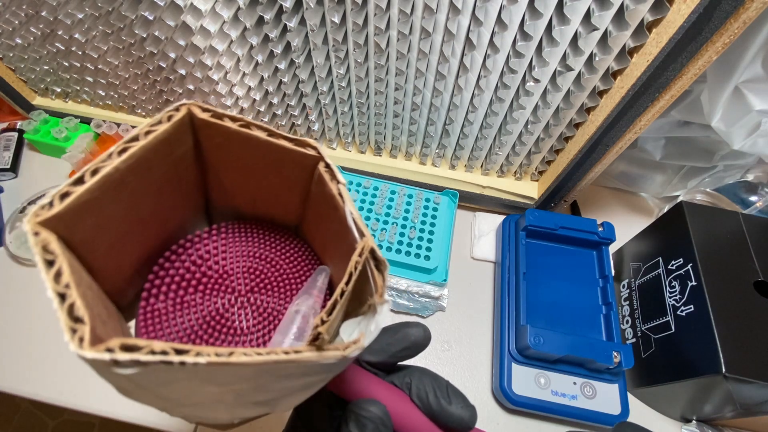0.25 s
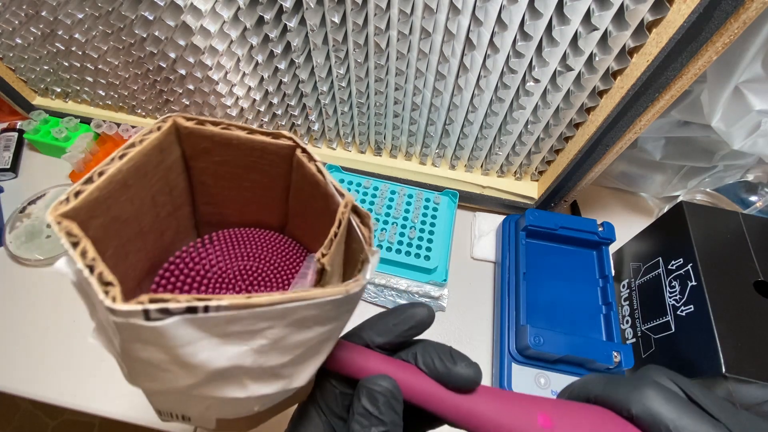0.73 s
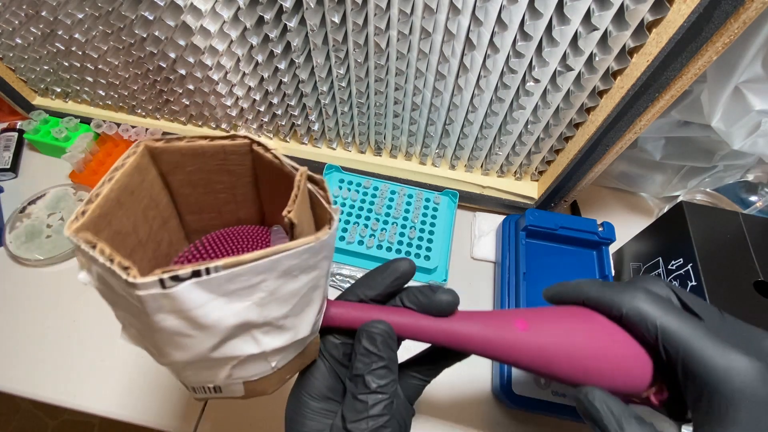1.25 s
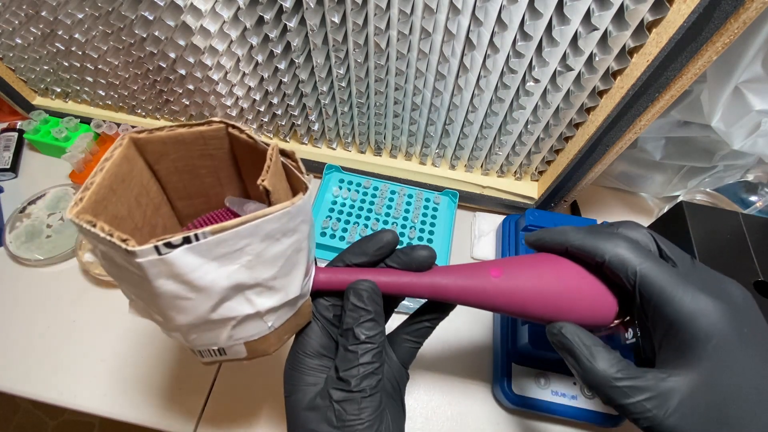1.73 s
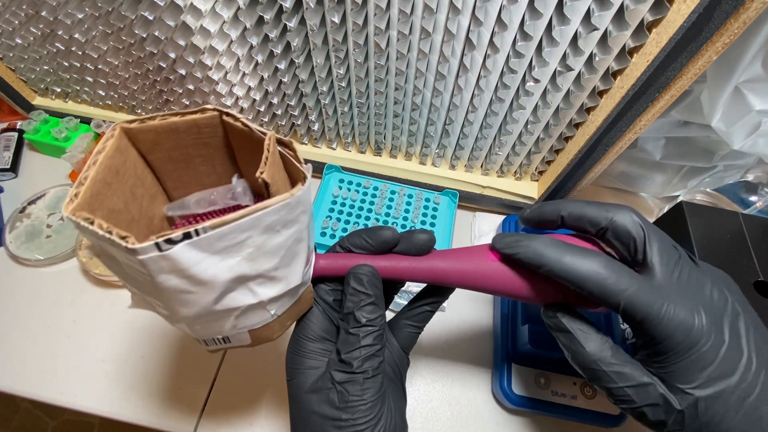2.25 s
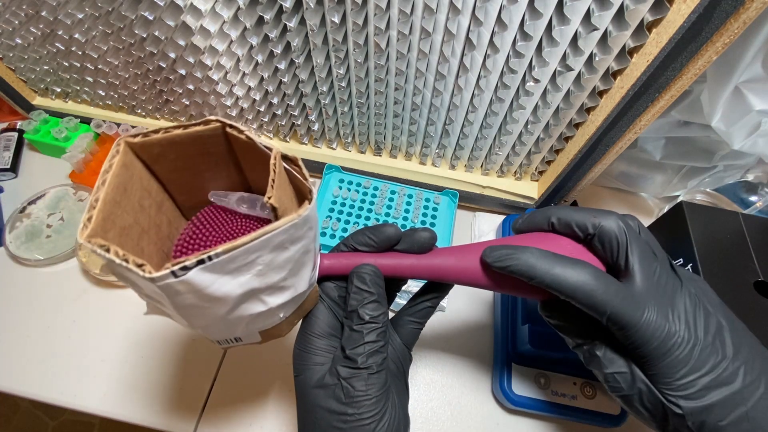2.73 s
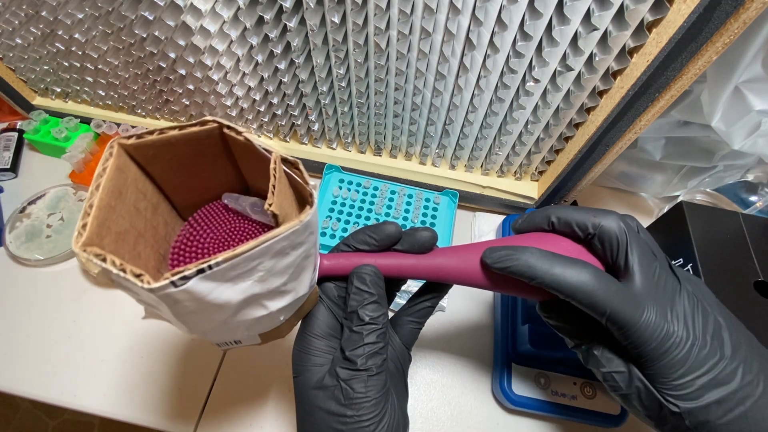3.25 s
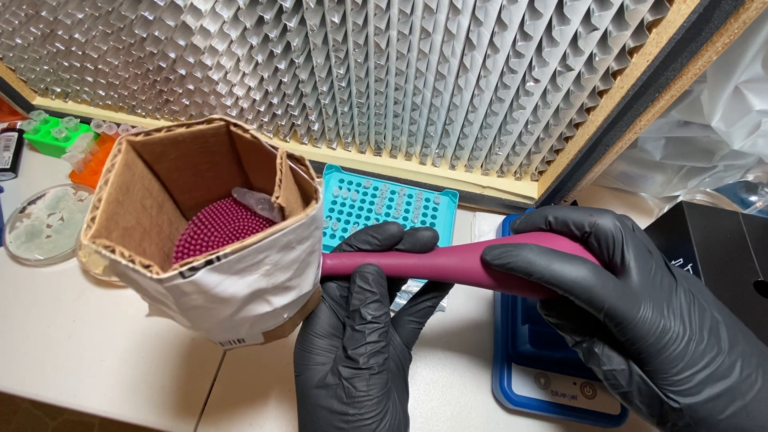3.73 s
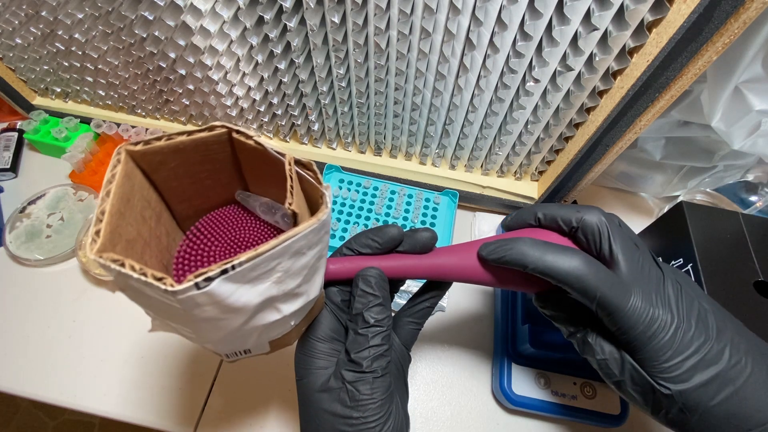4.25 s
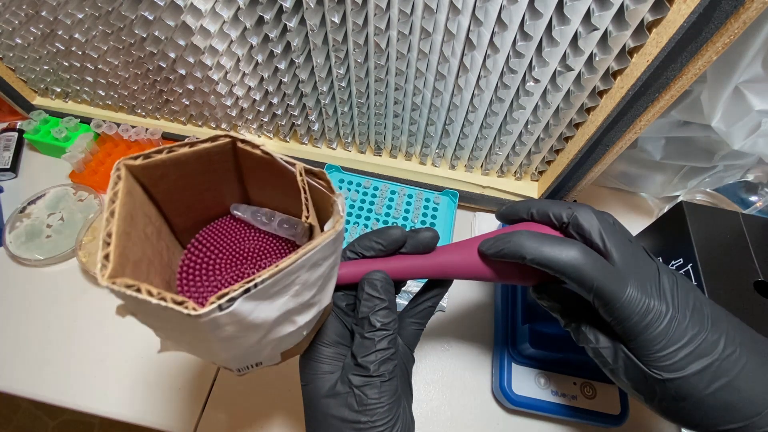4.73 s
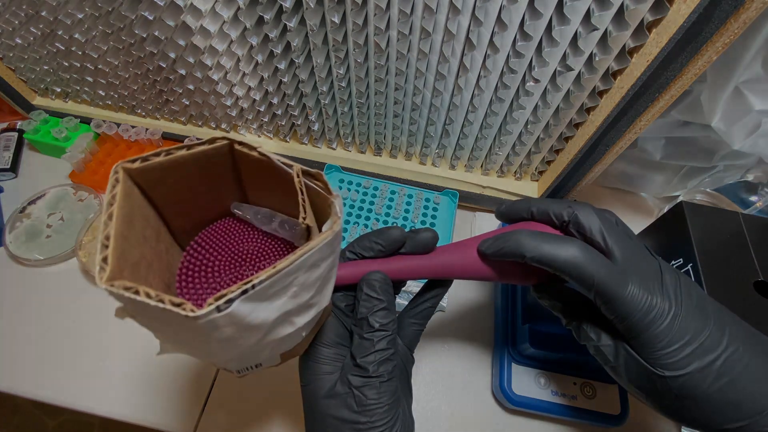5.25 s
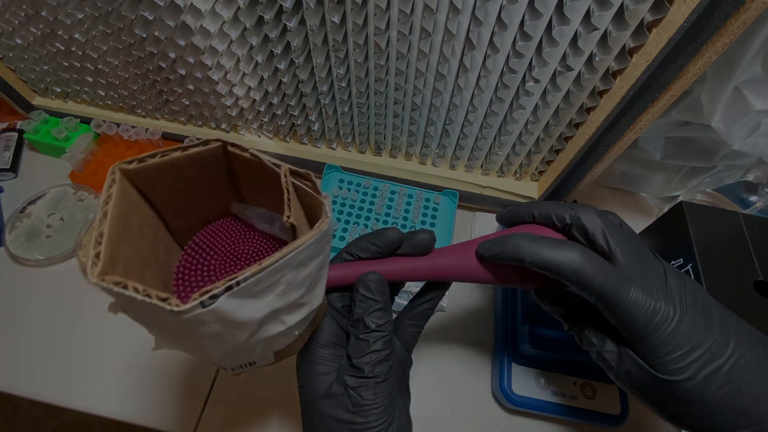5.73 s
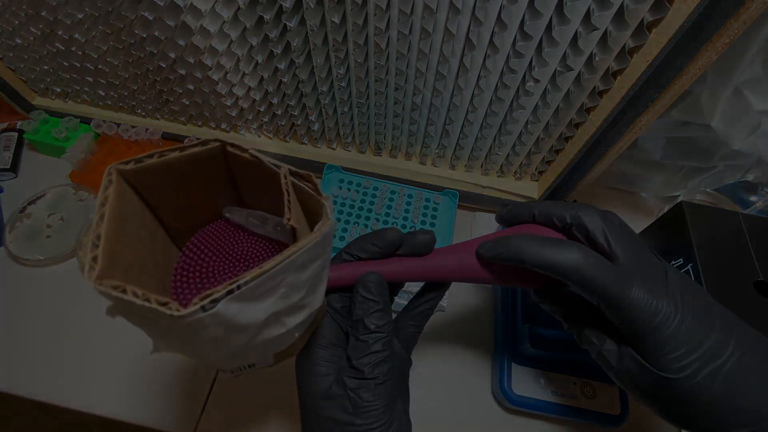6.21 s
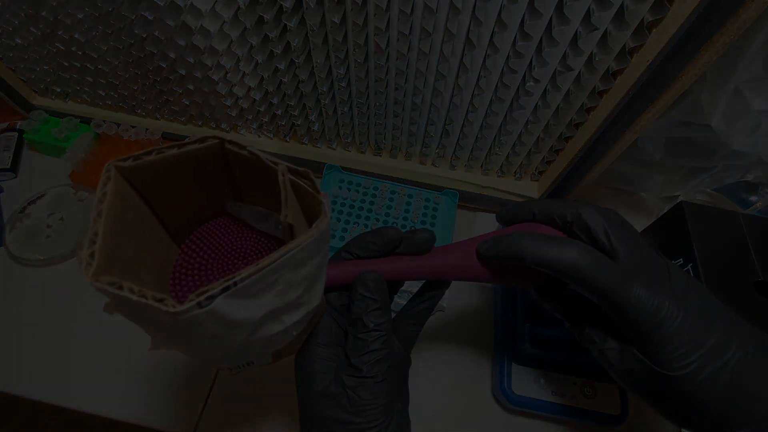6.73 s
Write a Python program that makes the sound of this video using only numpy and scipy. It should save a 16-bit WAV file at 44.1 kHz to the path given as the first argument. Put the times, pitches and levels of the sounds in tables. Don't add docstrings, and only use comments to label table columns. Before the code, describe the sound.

Low vibrating buzz with irregular hollow cardboard knocks and plastic ticks close by, slowly fading; a button click raises the hum before it dies.

```python
import sys
import numpy as np
from scipy import signal
from scipy.fft import rfft, irfft, next_fast_len
from scipy.io import wavfile
from scipy.ndimage import uniform_filter1d

SR = 44100
rng = np.random.default_rng(int(sys.argv[2]) if len(sys.argv) > 2 else 0)


def inscribe(sig):
    pcm = np.round(np.clip(np.atleast_2d(sig).T, -1, 1) * 32767)
    wavfile.write(sys.argv[1], SR, pcm.astype(np.int16))


def level_to_linear(level):
    exponent = np.asarray(level, float) / 20
    return 10 ** exponent


N = 307818


def unit(x):
    return x / np.sqrt(np.mean(x ** 2) + 1e-20)


def in_time(rows):
    t, *columns = np.transpose(rows)
    return [np.interp(np.arange(N) / SR, t, column) for column in columns]


def drift(rate):
    r = np.exp(-80 * np.pi * rate / SR)
    slow = signal.lfilter([1], [1, -2 * r, r * r], rng.standard_normal(N // 40 + 2002))
    slow = unit(slow[2000:])
    return np.interp(np.arange(N) / 40, np.arange(len(slow)), slow)


def train(at, sizes):
    clicks = np.full(N, 1e-18)
    np.add.at(clicks, at, sizes)
    return clicks


def resonate(x, peaks):
    out = 0
    for k, (hz, width_hz, db) in enumerate(peaks):
        r = np.exp(-np.pi * width_hz / SR)
        poles = [1, -2 * r * np.cos(2 * np.pi * hz / SR), r * r]
        zeros = np.array([1, 0, -1]) * (1 - r * r) / 2
        out = out + (-1) ** k * level_to_linear(db) * signal.lfilter(zeros, poles, x)
    return out


def strike(at, levels_db, modes, spread_db, sign=1):
    out = np.zeros((2, N))
    chance = rng.standard_normal((len(at), len(modes)))
    spot = np.arange(len(at)) % 3
    for k, (hz, db, t60, right_db, turn) in enumerate(modes):
        sizes = sign ** k * level_to_linear(levels_db + db + spread_db * chance[:, k])
        r = level_to_linear(-60 / (t60 * SR))
        for place in range(3):
            clicks = train(at[spot == place], sizes[spot == place])
            detune = 1 + .012 * (place - 1) * (-1) ** k
            w = 2 * np.pi * hz * detune / SR
            ring = signal.lfilter([1], [1, -2 * r * np.cos(w), r * r], clicks)
            out[0, 1:] += r * np.sin(w) * ring[:-1]
            turned = np.sin(turn) * ring[1:] + r * np.sin(w - turn) * ring[:-1]
            out[1, 1:] += level_to_linear(right_db) * turned
    return out


def crack(at, levels_db, peaks, dies_s, noise, click=0.19):
    clicks = train(at, level_to_linear(levels_db))
    dying = signal.lfilter([1], [1, -np.exp(-1 / (dies_s * SR))], clicks)
    return resonate(click * clicks + noise * dying, peaks)


def coloured(spectrum, alike):
    hz, db = np.transpose(spectrum)
    size = next_fast_len(N)
    bins_hz = np.arange(size // 2 + 1) * SR / size
    shape = level_to_linear(np.interp(np.log(bins_hz + 1), np.log(hz), db, right=-200))
    mid, side = irfft(rfft(rng.standard_normal((2, size))) * shape, size)[:, :N]
    alike = np.clip(alike, -1, 1)
    opposite = np.array([[1], [-1]])
    return unit(np.sqrt(1 + alike) * mid + np.sqrt(1 - alike) * side * opposite)


LOW_SPEED_HZ, HIGH_SPEED_HZ = 69.3, 84.2
# multiple of the low turn rate (those below 5 follow the motor, the others hold their pitch), #
# level/dB, phase between ports/rad
WHINE = [(2.047, -61, 0.18), (4.047, -66, 1.2), (7.31, -58, 2.9), (11.25, -63, 1.28), (12.9, -60.5, 1.9),
         (17.44, -83, 4.2), (30.64, -66, 4.9), (42.8, -74, 0.19)]


def motor(phase, hum_db, pan_db, lead):
    side = np.array([[.5], [-.5]])
    out = level_to_linear(hum_db + 5.5 + side * pan_db + 0.73 * drift(19.0)) * np.sin(phase + side * lead)
    smooth_db = uniform_filter1d(hum_db, size=SR // 3) + 35.0
    steady = 2 * np.pi * LOW_SPEED_HZ * np.arange(N) / SR
    for order, db, turn in WHINE:
        turning = phase if order < 5 else steady
        level = level_to_linear(db + smooth_db + 3.2 * drift(5.6) + side * 2.0)
        out += level * np.sin(order * turning + 1.02 * drift(3.0) + side * turn)
    return out


# t/s, hum level/dB
NEARNESS = [
    (0, -30.5),
    (.9, -32.5),
    (1.2, -34.5),
    (1.7, -36),
    (4.8, -36.5),
]
STEP_UP_S, SPIN_UP_S, STEP_UP_DB, OVERSHOOT_DB, SETTLE_S = 5.57, 0.162, -1.5, 4, 0.67
SWITCH_OFF_S, RUN_DOWN_HZ_PER_S2 = 6.55, 190
STALL_S, STALL_DB_PER_S = 6.79, 135
DIP_S, DIP_DB_PER_S, KICK_S, KICK_DB_PER_S = 6.91, 302, 6.94, 750
FADE_S, FADE_DB_PER_S = 4.27, 1.5


def controls():
    t = np.arange(N) / SR

    def since(start_s):
        return np.maximum(t - start_s, 0)

    spun = np.clip((t - STEP_UP_S) / SPIN_UP_S, 0, 1)
    speed_hz = LOW_SPEED_HZ + (HIGH_SPEED_HZ - LOW_SPEED_HZ) * spun
    speed_hz -= RUN_DOWN_HZ_PER_S2 * since(SWITCH_OFF_S) ** 2
    fade_db = -FADE_DB_PER_S * since(FADE_S)
    overshoot_db = OVERSHOOT_DB * np.exp(-since(STEP_UP_S + SPIN_UP_S) / SETTLE_S)
    hum_db = in_time(NEARNESS)[0] + fade_db + spun * (STEP_UP_DB + overshoot_db)
    hum_db -= STALL_DB_PER_S * since(STALL_S) + DIP_DB_PER_S * since(DIP_S)
    hum_db += KICK_DB_PER_S * since(KICK_S)
    return 2 * np.pi * np.cumsum(speed_hz) / SR, hum_db, fade_db


# f/Hz, level/dB, t60/s, right port level/dB, right port phase/rad
CUP_WALL = [(933, -9.5, 0.062, -9, 4.35), (1103.5, -5, 0.077, -8.5, 3.45), (1132.4, -17, 0.18, -8.5, 2.36),
            (1221.6, -16, 0.17, -5.5, 2.03), (1163, -1.5, 0.039, -6.5, 3.43), (734, -19.5, 0.031, 7, 3.62),
            (3030, -13.5, 0.0051, -3, 1.5)]
CUP_AIR = [(1234, -2.5, 0.025, -6, 2.1), (1320, -10.5, 0.0077, -2.5, 2.88), (2113, -18, 0.013, -1, 0.74)]
CUP_RIM = [(1509, -10.5, 0.034, -4.5, 2.6), (1644, -12, 0.032, -4.5, 2.4),
           (1810, -10.5, 0.031, -11.5, 3.73), (1945, -25, 0.15, 1.5, 2.27)]
THUMP = [(373.3, -4.5, 0.072, -3.5, -1.3), (541, 2.5, 0.024, -14.5, -3.5), (693, -3, 0.025, -6.5, -5)]
# f/Hz, width/Hz, level/dB
SLAP = [(1110, 300, -3.5), (1450, 500, -20), (2240, 600, 20.5), (3200, 3200, -11.5)]
EDGE = [(2070, 390, -4.5), (2820, 740, 4), (4490, 1920, 3), (5230, 1350, 4.5), (6960, 10300, -13)]
TICK = [(8360, 330, 5), (10280, 1300, 3), (12440, 2130, 4.5), (15900, 2000, -3)]
# t/s, wall level/dB, dull thump level/dB, cup air level/dB, rim level/dB
POSE = [(0, -14.5, -9, 5.5, -9), (1.2, -4.5, -3, 7, -2.5), (1.5, -5.5, -9, -2, -2),
        (1.7, -2.5, -4.5, -1, 1.5), (2.0, -1, -6.5, 1.5, -2), (2.35, 1, -2, -2, -5.5),
        (2.48, -4.5, -23, 2.5, 1.5), (3.0, -2.5, -12, 1.5, 0.5), (3.3, -0.5, -5, -7.5, -2.5),
        (5.0, 0.5, -6, -8.5, -3), (6.98, -5.5, -9.5, -9.5, -8)]


def tube(at, db, edge_db, tick_db):
    wall_db, thump_db, air_db, rim_db = (db + column[at] for column in in_time(POSE))
    body = strike(at, wall_db + 2.5, CUP_WALL, spread_db=3.5)
    body += strike(at, air_db + 0.5, CUP_AIR, spread_db=2.5)
    body += strike(at, rim_db + 2.0, CUP_RIM, spread_db=4.5)
    little_bass = signal.butter(3, 840, "high", fs=SR, output="sos")
    body = signal.sosfilt(little_bass, body)
    body += strike(at, thump_db - 7.0, THUMP, spread_db=4.5, sign=-1.16)
    out = signal.sosfilt(signal.butter(1, 3000, fs=SR, output="sos"), body)
    out += crack(at, db + 2.5, SLAP, .001, 0, click=0.63) * np.array([[1], [-.3]])
    shared, left, right = rng.standard_normal((3, N))
    out[0] += crack(at, edge_db + 10.0, EDGE, 0.0024, 0.34 * shared + 1.1 * left, click=1.33)
    out[1] += crack(at, edge_db + 8.5, EDGE, 0.0023, 1.02 * right - 0.14 * shared, click=0.19)
    tick = crack(at, tick_db + 10.0, TICK, 0.00086, shared)
    out[0] += tick
    out[1] -= np.roll(tick, -10)
    return out


# t/s, peak level/dB, brightness
# level/dB
TOUCHES = [(0.006, -17, -11.5), (0.015, -22, -21.5), (0.037, -24, -14), (0.0458, -34, -16),
           (0.0634, -16, -15), (0.074, -33, -18), (0.1047, -16, -19), (0.133, -50, -25), (0.146, -38, -30),
           (0.1653, -20, -22), (0.174, -25, -28), (0.1969, -27, -19), (0.2051, -19.5, -18),
           (0.2364, -29, -20), (0.249, -45, -15), (0.2613, -17, -16), (0.2928, -54, -17),
           (0.3062, -14.5, -20), (0.315, -36, -25), (0.323, -42, -24), (0.3508, -15.5, -12),
           (0.3788, -27, -34), (0.392, -23, -7), (0.4196, -26.5, -20), (0.4342, -24, -15), (0.449, -36, -9),
           (0.471, -33, -14), (0.4777, -18.5, -18), (0.512, -19.5, -17), (0.5193, -40, -20),
           (0.5552, -21, -13), (0.5693, -20, -13), (0.5934, -32, -11), (0.612, -18.5, -13.5),
           (0.665, -24.5, -14.5), (0.6844, -38, -21), (0.6944, -49, -22), (0.7248, -19, -12.5),
           (0.7422, -38, -21), (0.7711, -20, -12.5), (0.7862, -33, -22), (0.813, -20.5, -18.5),
           (0.8581, -19.5, -13), (0.9047, -25, -19), (0.915, -19, -10), (0.9713, -46, -18),
           (0.9884, -19, -11), (0.996, -32, -23), (1.0305, -23, -10), (1.0874, -22, -10),
           (1.156, -27.5, -7.5), (1.1929, -52, -15), (1.2048, -27, -11.5), (1.2467, -22, -21),
           (1.3003, -35, -11), (1.317, -26.5, -9), (1.3769, -22.5, -20), (1.417, -17, -12.5),
           (1.49, -39, -13), (1.506, -16.5, -27), (1.5204, -23, -20), (1.5459, -20.5, -11.5),
           (1.601, -35, -13), (1.6374, -22, -14.5), (1.6633, -21.5, -16), (1.6696, -21.5, -27),
           (1.6766, -23, -32), (1.6892, -29, -14), (1.703, -21, -40), (1.7315, -40, -35),
           (1.7509, -27, -37), (1.7617, -22, -39), (1.7779, -18.5, -23), (1.8031, -23.5, -34),
           (1.8181, -23, -15), (1.835, -25, -31), (1.8534, -27, -32), (1.862, -26.5, -40),
           (1.879, -27, -33), (1.892, -20, -18), (1.911, -33, -29), (1.9183, -29, -35), (1.9329, -23, -18),
           (1.9486, -24.5, -33), (1.991, -31, -18), (2.007, -29.5, -17), (2.034, -28, -18),
           (2.051, -25.5, -18), (2.0572, -18.5, -13), (2.064, -33, -23), (2.086, -40, -25),
           (2.0972, -14, -27), (2.1108, -29, -24), (2.1358, -24, -21), (2.165, -27, -14),
           (2.1966, -23, -22), (2.228, -14, -24.5), (2.2384, -18.5, -12), (2.302, -41, -14),
           (2.312, -20.5, -12), (2.3254, -17.5, -12), (2.344, -24.5, -12), (2.3863, -20, -18),
           (2.403, -37, -22), (2.4126, -26, -13), (2.4756, -17.5, -20), (2.492, -23.5, -11),
           (2.5171, -9.5, -29), (2.528, -24, -17), (2.599, -17.5, -38), (2.637, -36, -10),
           (2.6605, -11, -21), (2.673, -32, -6), (2.7116, -34, -28), (2.8234, -18.5, -27),
           (2.8347, -21.5, -15), (2.847, -24.5, -17), (2.8747, -12, -20),
           (3.056, -53, -24), (3.089, -51, -27), (3.132, -48, -25), (3.1465, -30.5, -20),
           (3.1624, -51, -27), (3.1728, -26, -17), (3.1787, -14.5, -19.5), (3.2359, -23.5, -16),
           (3.2755, -42, -22), (3.2892, -28.5, -23), (3.322, -28.5, -39), (3.353, -31, -32),
           (3.422, -25, -26), (3.4374, -19, -15), (3.4503, -23, -19), (3.4673, -26.5, -24),
           (3.506, -43, -13), (3.5218, -27, -26), (3.53, -30, -16), (3.5392, -22.5, -19),
           (3.5506, -22.5, -29), (3.5617, -38, -20), (3.5712, -32, -20), (3.5978, -33, -16),
           (3.626, -30, -37), (3.6526, -29, -34), (3.6688, -26.5, -28), (3.683, -19.5, -23.5),
           (3.71, -35, -22), (3.728, -26, -8.5), (3.7367, -20.5, -29), (3.7951, -23, -15),
           (3.8097, -23, -22), (3.8301, -26.5, -25), (3.843, -29, -29), (3.8604, -39, -29),
           (3.8717, -45, -18), (3.8842, -26, -23), (3.902, -25.5, -26), (3.9132, -20.5, -18),
           (3.9249, -26, -35), (3.9412, -21, -19), (3.993, -42, -29), (4.0129, -28, -37), (4.038, -31, -36),
           (4.055, -42, -30), (4.069, -23.5, -38), (4.0867, -20, -16), (4.1164, -31, -25),
           (4.136, -53, -17), (4.1436, -19, -17.5), (4.178, -45, -17), (4.1843, -31, -25),
           (4.2327, -24.5, -14), (4.2435, -36, -6), (4.2605, -28, -28), (4.274, -18.5, -13),
           (4.289, -32, -32),
           (4.301, -34, -11), (4.318, -26, -26), (4.3502, -28, -15), (4.362, -24.5, -16),
           (4.3713, -30, -25), (4.4, -30, -36), (4.417, -24, -28), (4.432, -21.5, -13), (4.4607, -31, -21),
           (4.4864, -30, -25), (4.505, -21, -22), (4.5435, -38, -25), (4.5592, -23.5, -30),
           (4.601, -44, -25), (4.6163, -28, -27), (4.6368, -23, -11), (4.6484, -18.5, -12),
           (4.66, -33, -17), (4.6753, -31, -24), (4.7038, -24.5, -24), (4.727, -43, -23),
           (4.7423, -44, -18), (4.757, -33, -20), (4.7786, -36, -19), (4.7921, -21, -10),
           (4.8187, -23.5, -30), (4.8766, -26, -19), (4.893, -29, -30), (4.9094, -26.5, -14),
           (4.922, -48, -24), (4.9351, -20, -11), (4.9803, -30, -36), (4.9931, -28.5, -42),
           (5.037, -29.5, -34), (5.0513, -36, -23), (5.0792, -15.5, -10), (5.121, -31, -26),
           (5.194, -28, -38), (5.205, -26.5, -20), (5.221, -27, -33), (5.2386, -33, -30),
           (5.2467, -36, -18), (5.256, -26, -13), (5.2837, -22.5, -29), (5.3092, -29, -36),
           (5.352, -31, -30), (5.3667, -21, -11), (5.379, -25, -29), (5.396, -37, -8), (5.421, -29, -25),
           (5.4405, -25, -19), (5.469, -26.5, -31), (5.4983, -22, -9.5), (5.5099, -24.5, -18),
           (5.5348, -31, -25), (5.5587, -29.5, -12), (5.574, -21, -16), (5.5975, -27.5, -26),
           (5.6475, -27.5, -19), (5.6697, -52, -18), (5.6814, -32, -33), (5.71, -21.5, -20),
          (5.72, -35, -32), (5.733, -38, -20), (5.7464, -27.5, -13), (5.763, -30, -27),
          (5.7871, -27.5, -25), (5.812, -24.5, -28), (5.829, -34, -18), (5.85, -17, -20),
          (5.8603, -38, -26), (5.885, -39, -20), (5.908, -33, -19), (5.9408, -23, -19), (5.9526, -21, -20),
          (5.991, -31, -21), (6.0015, -22, -17), (6.022, -30, -23), (6.0939, -24, -22), (6.1161, -19, -15),
          (6.153, -32, -27), (6.168, -34, -28), (6.2105, -29.5, -17), (6.2332, -27.5, -30),
          (6.259, -39, -26), (6.2732, -20, -11), (6.319, -27, -30), (6.3523, -31, -24), (6.392, -21.5, -14),
          (6.416, -29.5, -21), (6.4404, -38, -22), (6.4619, -24.5, -15), (6.4965, -25, -26),
          (6.5113, -23, -19), (6.543, -33, -25), (6.5682, -28.5, -33), (6.603, -41, -26),
          (6.6127, -53, -21), (6.6202, -25.5, -14.5), (6.659, -31, -22), (6.6689, -22, -17),
          (6.676, -33, -19), (6.702, -35, -34), (6.7185, -30, -19), (6.745, -36, -32), (6.7573, -31, -39),
          (6.7828, -29, -14), (6.815, -37, -25), (6.839, -36.5, -39), (6.8577, -23.5, -22),
          (6.8776, -31.5, -30), (6.9106, -25, -24), (6.934, -36, -36)]
# t/s, extra hard edge level/dB
SQUARE = [(0, -7), (1.2, -2.5), (1.6, 2.5), (1.75, 0), (2.03, -4.5), (2.35, -1), (2.52, 2), (2.9, -2),
          (3.2, 0), (4.9, 2.5), (5.5, 3), (6.98, -10)]
TICK_DULLS_DB_PER_S = 0.67


def landings():
    t, db, bright = np.transpose(np.array(TOUCHES))
    at = ((t + .0004) * SR).astype(int)
    db, bright = db - 6.0, bright - 5.5
    edge = -16 + in_time(SQUARE)[0][at] + 0.52 * (bright + 20) + 0.03 * (db + 30.0)
    edge += rng.standard_normal(len(at))
    return at, db, db + edge, db + bright + 3.0 - TICK_DULLS_DB_PER_S * t


# f/Hz, width/Hz, level/dB
SNAP = [(3700, 1240, 7.5), (4860, 1170, 10.5), (6550, 2200, 2.5), (10700, 3100, -6)]
# t/s, peak level/dB
BUTTON = [
    (5.4028, -23),
    (5.584, -39),
    (6.3382, -26),
    (6.487, -39),
    (6.9734, -29.5),
]


def button():
    t, db = np.transpose(BUTTON)
    at = (t * SR).astype(int)
    noise = rng.standard_normal((3, N))
    snap = crack(at + 36, db + 7.5, SNAP, 0.0013, 0.22 * noise[2] + 0.22 * noise[:2], click=1.14)
    first_tick = crack(at - 4, db - 6.5, TICK, 0.00028, noise[2])
    rebound = crack(np.minimum(at + 180, N - 1), db - 8.0, SNAP, 0.00067, 0.34 * noise[:2])
    echo = crack(at, db - 23.5, SNAP, 0.041, noise[:2], click=0)
    return (snap + first_tick + rebound + echo) * level_to_linear(np.array([[1.5], [-1.5]]))


def bench(x):
    dull = signal.sosfilt(signal.butter(1, 6000, fs=SR, output="sos"), x)
    out = np.zeros_like(x)
    for k, lag_s in enumerate(rng.uniform(0.005, .06, 24)):
        lag = int(lag_s * SR)
        out[k % 2, lag:] += (-1) ** (k // 2) * level_to_linear(-14.0 - 343 * lag_s) * dull[k % 2, :-lag]
    return out


# f/Hz, level/dB per Hz
WHIRR = [(300, -29), (450, -3.5), (650, -4), (900, -2), (1200, -2.5), (1500, -7.5), (2000, -11),
         (2500, -17.5), (3000, -15), (4000, -20), (4900, -16.5), (6000, -24.5), (7500, -24), (9000, -70)]
RUMBLE = [(15, -10), (30, -28), (60, 12.5), (120, -7.5), (200, -2.5), (300, -12.5), (450, -13.5),
          (800, -54)]
HISS = [(3000, -20), (6000, -2), (7400, -6), (8200, -12), (8800, -3), (9500, -20), (10300, 0), (12400, 0),
        (13000, -26), (13900, -26), (14400, 0), (15800, -2), (16300, -25)]
# f/Hz, width/Hz, level/dB
ROOM = [(121.3, 8.7, -4), (143.7, 21, -8.5), (191.4, 6.4, -2), (241, 4.9, -2), (276.5, 14.5, -5),
        (329, 7.9, -6.5)]
# t/s, f/Hz, level/dB
MOAN = [(2.8, 270.7, -82), (2.93, 250, -56), (3.2, 255, -60.5), (3.33, 295, -54), (3.44, 350, -54),
        (3.52, 281, -56), (3.66, 261.4, -63), (3.85, 253, -80)]
RUMBLE_DB, HISS_DB, WHIRR_DB = -48.5, -76, -18
PASSING_S, PASSING_WIDTH_S, PASSING_DB, DRONE_DB = 3.24, 0.66, -52, -60


def air(phase, hum_db, fade_db):
    whirr_db = WHIRR_DB + np.maximum(hum_db + 37.5, -9) * 0.74 - 37.5
    passing = np.exp(-((np.arange(N) / SR - PASSING_S) / PASSING_WIDTH_S) ** 2)
    rumble = level_to_linear(RUMBLE_DB + 2.0 * fade_db + 1.24 * drift(1.7)) * coloured(RUMBLE, alike=0.4)
    swell = (level_to_linear(DRONE_DB) + level_to_linear(PASSING_DB) * passing) * level_to_linear(2.0 * drift(8.1))
    drone = swell * unit(resonate(coloured([(20, 0), (20000, 0)], alike=0.83), ROOM))
    throb_db = 1.8 * np.sin(phase - 1.5) + np.array([[2.5], [-2.5]])
    whirr = level_to_linear(whirr_db + throb_db) * coloured(WHIRR, alike=-0.19)
    moan_hz, moan_db = in_time(MOAN)
    moan_phase = 2 * np.pi * np.cumsum(moan_hz) / SR + 0.9 * drift(9.5)
    moan = level_to_linear(moan_db + 2.3 * drift(9.7)) * np.sin(moan_phase)
    hiss = level_to_linear(HISS_DB + 5.2 * drift(25) + 1.2 * (whirr_db + 57.5)) * coloured(HISS, alike=0.28)
    return rumble + drone + moan + whirr + hiss


def scene():
    phase, hum_db, fade_db = controls()
    nearer_db = in_time(NEARNESS)[0] + fade_db + 36.5
    pan_db = 3.9 + .3 * nearer_db
    lead_rad = .75 + .085 * nearer_db
    hum = motor(phase, hum_db, pan_db, lead_rad)
    hits = tube(*landings()) + button()
    return hum + hits + bench(hits) + air(phase, hum_db, fade_db)


def band_limit(x):
    return signal.sosfilt(signal.butter(12, 16790, fs=SR, output="sos"), x)


def record(dry):
    mix = signal.sosfilt(signal.cheby2(10, 60, 17200, fs=SR, output="sos"), dry)
    return band_limit(mix)


dry = scene()
out = record(dry)
inscribe(out)
```